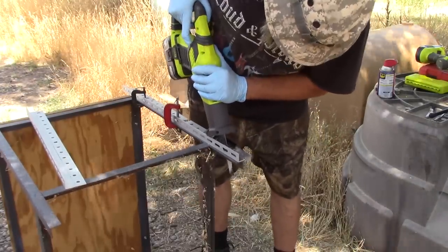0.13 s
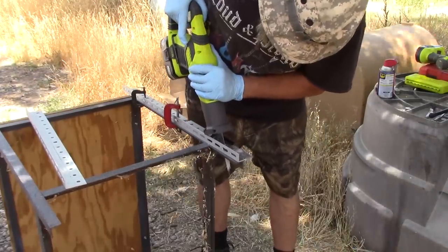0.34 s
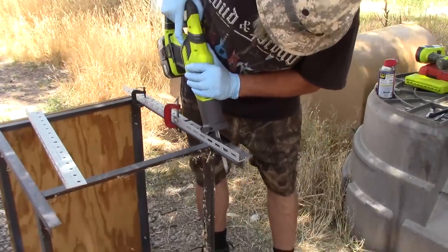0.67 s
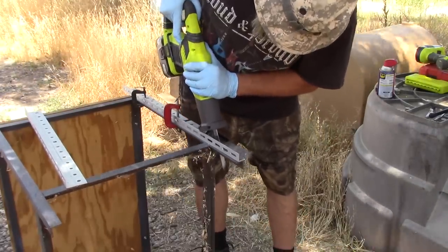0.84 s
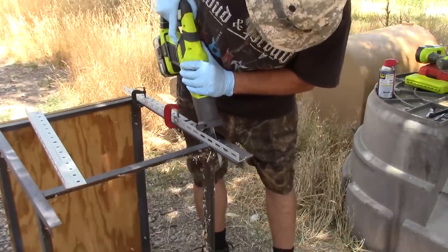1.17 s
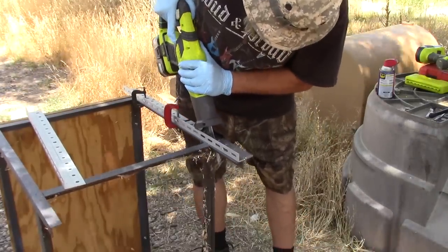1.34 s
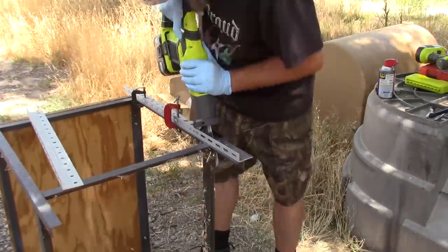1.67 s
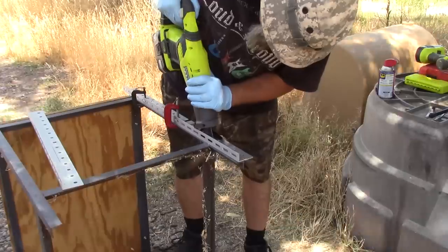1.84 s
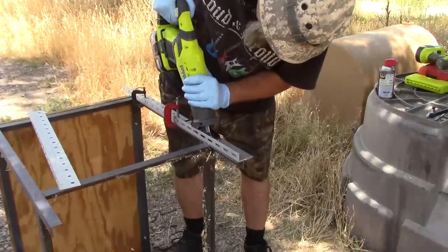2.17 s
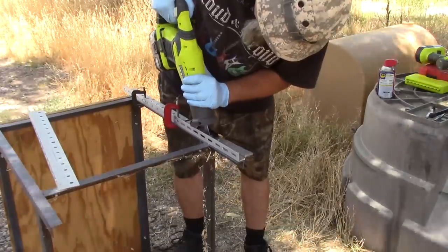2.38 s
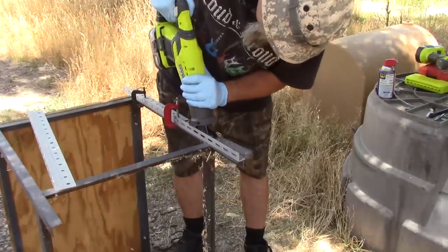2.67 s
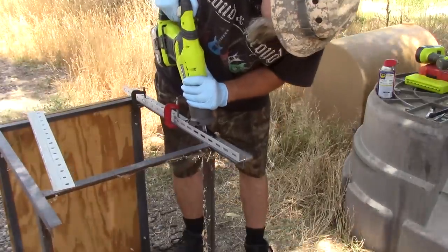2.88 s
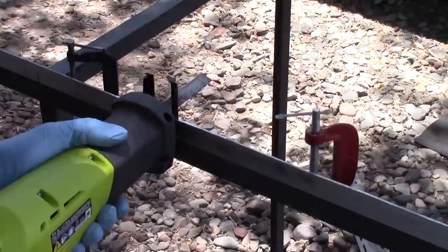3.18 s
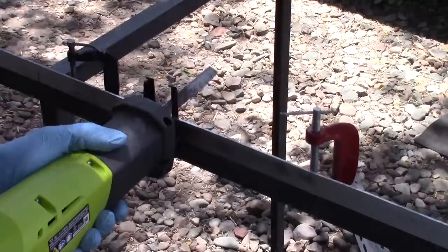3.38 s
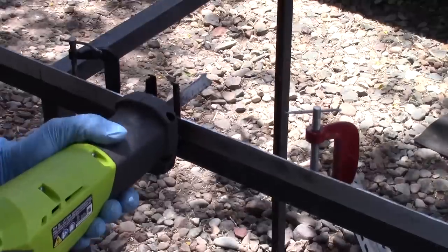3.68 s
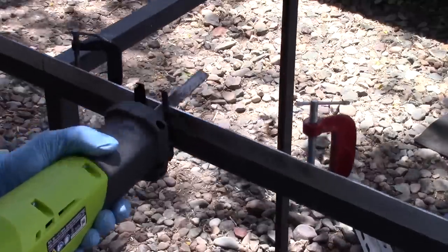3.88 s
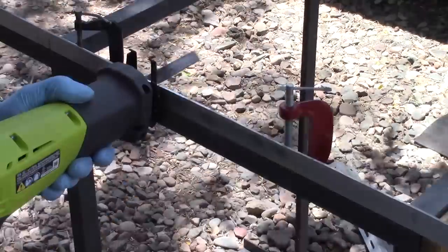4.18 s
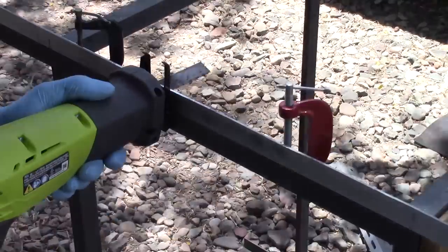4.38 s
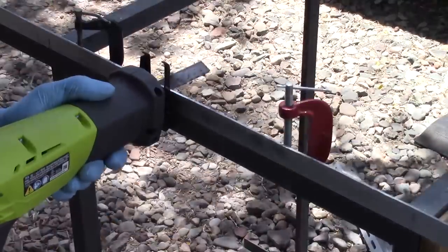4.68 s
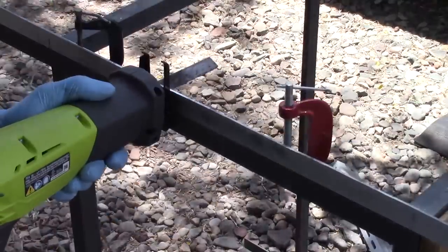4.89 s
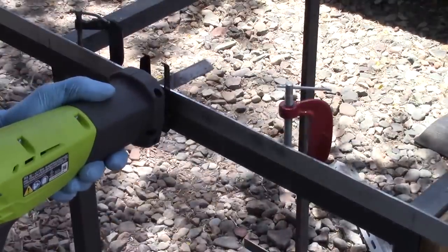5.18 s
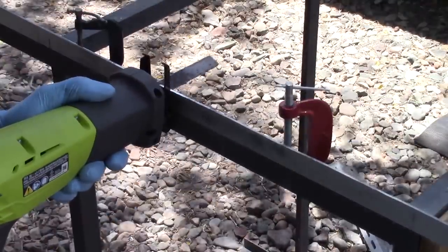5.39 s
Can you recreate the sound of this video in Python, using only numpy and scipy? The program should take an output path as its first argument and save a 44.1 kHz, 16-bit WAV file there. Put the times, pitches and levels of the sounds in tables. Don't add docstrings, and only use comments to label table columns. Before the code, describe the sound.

A power saw's teeth rasp densely on steel, with faint motor hum and wavering high squeals. It stops, rings and bites again, then the view jumps nearer: a hard knock and five or six rough, stuttering cuts, the metal vibrating louder and looser each time. Low gusty handling bumps fill the short gaps. Dry outdoor yard, small camera microphone, little low bass, compressed loud peaks, no speech.

```python
import sys
import numpy as np
from scipy import signal
from scipy.fft import rfft, irfft, next_fast_len
from scipy.io import wavfile
from scipy.ndimage import uniform_filter1d, minimum_filter1d

SR = 44100
rng = np.random.default_rng(int(sys.argv[2]) if len(sys.argv) > 2 else 0)


def amplitude_ratio(level_db):
    exponent = np.asarray(level_db, float) / 20
    return 10 ** exponent


def file_out(sig):
    cols = np.atleast_2d(sig).T
    lim = np.clip(cols, -1, 1)
    pcm = np.round(lim * 32767).astype(np.int16)
    wavfile.write(sys.argv[1], SR, pcm)


N = 243860
SIZE = next_fast_len(N + 4096)
HZ = np.maximum(np.arange(SIZE // 2 + 1) * SR / SIZE, 1)
TIME = np.arange(N) / SR
MOVE_S, TAB_LOOSE_S = 3.158, 4.4


def rms_one(x):
    return x / np.sqrt(np.mean(x ** 2) + 1e-20)


def at_hz(points, hz):
    point_hz, point_db = np.transpose(points)
    return np.interp(np.log(hz), np.log(point_hz), point_db)


def band_db(points, low_hz, high_hz):
    return 10 * np.log10(np.sum(amplitude_ratio(at_hz(points, np.arange(low_hz, high_hz))) ** 2))


def drift(rate_hz):
    r = np.exp(-80 * np.pi * rate_hz / SR)
    noise = rng.standard_normal(N // 40 + 2002)
    slow = signal.lfilter([1], [1, -2 * r, r * r], noise)[2000:]
    return np.interp(np.arange(N) / 40, np.arange(len(slow)), rms_one(slow))


# (start t/s, end t/s, level/dB)
RUMBLE_SWELLS = [(1.6, 1.768, -31), (1.8, 3.0, -46), (3.028, 3.167, -32.5), (3.516, 3.706, -36),
                 (3.928, 4.142, -40.5), (4.266, 4.374, -29), (4.604, 4.659, -27.5), (4.87, 4.926, -23),
                 (5.213, 5.236, -43.5)]
SWELL_RISE_DB_S, SWELL_FALL_DB_S = 263, 310
FLOOR_FAR_DB, FLOOR_NEAR_DB = -53.5, -76


def rumble_swells():
    levels = [np.where(TIME > MOVE_S, FLOOR_NEAR_DB, FLOOR_FAR_DB)]
    for start, end, db in RUMBLE_SWELLS:
        rise = SWELL_RISE_DB_S * np.maximum(start - TIME, 0)
        fall = SWELL_FALL_DB_S * np.maximum(TIME - end, 0)
        levels.append(db - rise - fall)
    return np.max(levels, axis=0)


# (f/Hz, level/dB per Hz)
RUMBLE_COLOUR = [(59, -36), (100, -16.5), (199, 1), (383, 0.5), (428, -5.5), (479, -12.5), (600, -12.5),
                 (780, -53), (1320, -120)]


def rumble(lumpy_db):
    steepen_db = 18 * np.maximum(np.log2(HZ / 600), 0)
    colour = amplitude_ratio(at_hz(RUMBLE_COLOUR, HZ) - steepen_db)
    noise = rms_one(irfft(rfft(rng.standard_normal(N), SIZE) * colour, SIZE)[:N])
    return noise * amplitude_ratio(rumble_swells() + lumpy_db * drift(14))


# (t/s, peak level/dB, pulse width/ms, crack level/dB rel.)
KNOCKS = [(1.755, -18, .15, 2), (3.156, -14, 1.6, -12), (3.219, -5.5, .15, -1), (3.673, -21.5, .8, -3),
          (4.0549, 1.5, 2.4, -1), (4.398, -24, .5, -4), (4.034, -24, .4, 0), (4.683, -25, .2, 3),
          (4.415, -28, .3, 2), (4.405, -32, .15, 3), (4.7, -31, .2, 3), (3.692, -33, .15, 3),
          (4.911, -5, 1.8, -34), (3.285, -17, 2.2, -30), (5.225, -18, 2.2, -30), (1.795, -13, 2.2, -30)]


def knocks():
    out, t = np.zeros(N), np.arange(1500) / SR
    for start, db, width_ms, crack_db in KNOCKS:
        rise_s = width_ms / 4000
        push = np.e * t / rise_s * np.exp(-t / rise_s)
        debris = .12 * rng.standard_normal(len(t)) * np.exp(-t / .0015)
        crack = amplitude_ratio(crack_db) * (np.exp(-t / 1e-4) + debris)
        out[round(start * SR):][:len(t)] += amplitude_ratio(db) * (push + crack)
    return out


# (f/Hz, level/dB, t60/s)
BAR_NOTCHED = [(1233, -13, .29), (775, -16, .3), (3117, 1, .27), (3704, -6, .33), (4032, -13, .3),
               (4377, -15, .18), (4764, -20, .2), (5170, -15, .1), (6444, -7, .21), (646, -14, .5)]
BAR_DEEP_CUT = [(1357, -14, .23), (2353, 0, .11), (3117, -1, 1.5), (3413, -9, .15), (3704, -2, .5),
                (4382, -6, .18), (4775, -8, .2), (5173, 1, .17), (4040, -4, .08)]
TAB_WHOLE = [(2320, -11, .23), (3763, -6, .22), (4172, 0, .14), (6412, -6, .14), (4500, 0, .07),
             (3100, -6, .08), (7600, -4, .05)]
TAB_NOTCHED = [(2600, 0, .08), (3450, 0, .13), (3850, -10, .25)]
TAB_HALF_CUT = [(3790, 0, .08), (3941, -9, .2), (6040, -3, .06), (7600, -4, .05)]
TAB_LOOSE = [(1066, -8, .5), (1976, 0, .8), (2799, -13, .3), (2480, -11, .4), (3400, -11, .3),
             (6900, -15, .3), (3080, -2, .7), (6363, -4, .3), (7187, -10, .35), (1500, -10, .3),
             (4250, -10, .2), (5250, -11, .2), (7750, -12, .25)]
# (start t/s, damped t/s, level/dB, modes)
RING_ON = [
    (1.593, 1.755, -16, BAR_NOTCHED),
    (3.042, 3.156, -16.5, BAR_DEEP_CUT),
    (3.5, 3.7, -18.5, TAB_WHOLE),
    (3.98, 4.05, -16, TAB_NOTCHED),
    (4.31, 4.39, -19.5, TAB_HALF_CUT),
    (4.57, 4.695, -23, TAB_LOOSE),
    (4.845, 4.95, -26.5, TAB_LOOSE),
]


def rings():
    out = np.zeros(N)
    for start, stop, db, modes in RING_ON:
        t = np.arange(round((stop - start) * SR)) / SR
        gate = np.clip(t / .018, 0, 1) * np.clip((t[-1] - t) / .004, 0, 1)
        for hz, mode_db, t60 in modes:
            beat = 1 + .12 * np.sin(2 * np.pi * (rng.uniform(18.8, 60) * t + rng.random()))
            tone = np.sin(2 * np.pi * (hz * t + rng.random())) * beat
            out[round(start * SR):][:len(t)] += gate * tone * amplitude_ratio(db + mode_db - 60 * t / t60)
    return out


def glides(rows):
    out = np.zeros(N)
    for start, length, from_hz, to_hz, width_hz, db in rows:
        i = round(start * SR)
        size = min(round(length * SR), N - i)
        r = np.exp(-np.pi * width_hz / SR)
        draw = rng.standard_normal((2, 2 * SR))
        wander = signal.lfilter([1], [1, -2 * r, r * r], draw[0] + 1j * draw[1])[4000:][:size]
        phase = 2 * np.pi * np.cumsum(np.linspace(from_hz, to_hz, size)) / SR
        tone = rms_one(np.real(wander * np.exp(1j * phase)))
        hump = signal.windows.tukey(round(length * SR), .6)[:size]
        out[i:i + size] += amplitude_ratio(db) * tone * hump
    return out


# (t/s, length/s, from f/Hz, to f/Hz, level/dB)
HUM = [(0, 1.6, 375, 362, -38), (2.0, 1.05, 380, 345, -38), (5.0, .53, 385, 395, -39),
       (5.0, .53, 325, 330, -40), (5.1, .43, 860, 860, -34), (4.28, .2, 130, 120, -37),
       (1.61, .16, 115, 115, -44), (4.58, .17, 125, 115, -39), (5.0, .7, 490, 490, -39),
       (5.0, .7, 680, 680, -38), (5.0, .7, 1170, 1170, -35)]


def motor():
    rows = [(s, length, from_hz, to_hz, 15, db) for s, length, from_hz, to_hz, db in HUM]
    return amplitude_ratio(-0.9) * glides(rows)


STROKES_HZ, STROKE_PEAK_S = 48.5, 4.98


def strokes():
    turn = 2 * np.pi * STROKES_HZ * (TIME - STROKE_PEAK_S)
    return (np.cos(turn) + 1.1 * np.cos(2 * turn + 4.0)) * (TIME > TAB_LOOSE_S)


# (t/s, length/s, start f/Hz, level/dB)
SQUEALS = [(.3, .6, 7920, -27), (.45, .3, 9430, -25), (.6, .6, 5190, -30), (.9, .45, 9220, -23),
           (2.05, .25, 9050, -23), (2.05, 1.1, 5300, -24), (2.3, .2, 7800, -22), (2.45, .6, 7700, -28),
           (2.62, .43, 9210, -24)]
SAG_HZ_S, SECOND_CUT_S, SECOND_SAG_HZ_S = 800, 1.7, 430
# (t/s, length/s, f/Hz, level/dB)
CATCHES = [(.2, .5, 1500, -26), (.7, .65, 4215, -27), (1.58, .035, 880, -17), (1.8, .2, 1565, -20),
           (1.8, .15, 865, -24), (1.91, .13, 675, -22), (1.8, .55, 3840, -24), (3.76, .03, 5560, -24),
           (3.825, .025, 5560, -24), (3.88, .04, 5560, -21), (3.77, .04, 3400, -22), (3.83, .05, 3377, -20),
           (3.955, .05, 2600, -18), (4.11, .06, 560, -21), (4.393, .013, 1600, -35),
           (4.426, .018, 5600, -33), (4.684, .012, 2500, -34), (4.693, .02, 5600, -31),
           (4.72, .05, 3850, -21), (4.94, .02, 5600, -33), (4.955, .03, 740, -22), (.55, .42, 1270, -25),
           (1.05, .06, 4100, -22), (1.45, .04, 4200, -22), (2.75, .3, 5680, -26), (2.75, .3, 6620, -27),
           (3.93, .03, 5560, -25), (4.22, .03, 4800, -24), (4.19, .03, 5300, -25), (4.96, .4, 1970, -25),
           (4.95, .9, 3290, -25), (4.95, .9, 2830, -28), (4.73, .11, 1976, -25), (5.0, .3, 1620, -28)]
# (t/s, length/s, f/Hz, level/dB)
ROARS = [(4.44, .13, 3150, -19), (4.712, .021, 1360, -15.5), (4.705, .165, 3250, -17.5),
         (4.92, .9, 3300, -20), (4.92, .9, 2900, -23), (2.75, .3, 6100, -26)]
CATCH_WIDTH_HZ, ROAR_WIDTH_HZ = 70, 380


def squeals():
    rows = []
    for s, length, hz, db in SQUEALS:
        sag_hz_s = SECOND_SAG_HZ_S if s > SECOND_CUT_S else SAG_HZ_S
        rows.append((s, length, hz, hz - length * sag_hz_s, .036 * hz, db))
    for table, width_hz in ((CATCHES, CATCH_WIDTH_HZ), (ROARS, ROAR_WIDTH_HZ)):
        rows += [(s, length, hz, hz, width_hz, db) for s, length, hz, db in table]
    return amplitude_ratio(2.1 * strokes()) * glides(rows)


# (f/Hz, side minus mid level/dB)
WIDTH = [(60, -10), (110, -29), (190, -6), (330, -24.5), (580, -33), (1030, -45), (1820, -11),
         (3220, -16.5), (5690, -39.5), (10000, -19)]
WIDE_START_S, WIDE_END_S = 3.1, 4.15


def reflection(x):
    delay = np.exp(-2j * np.pi * HZ * 0.005)
    late = irfft(rfft(x, SIZE) * amplitude_ratio(at_hz(WIDTH, HZ) - 8.0) * delay, SIZE)[:N]
    wide = (TIME > WIDE_START_S) & (TIME < WIDE_END_S)
    return late * np.where(wide, amplitude_ratio(-1), amplitude_ratio(-27.5))


SPREAD_S = [0, 1.7, 3.1, 3.7, 4.06, 4.4]


def spread_stage():
    return np.searchsorted(SPREAD_S, TIME, side="right") - 1


# (side level/dB rel. at 7 kHz, loss/dB per octave down)
SPREAD = [(-7, -0.5), (-8, 6), (-8, 0.5), (-3.5, 3.5), (-3.5, 2.5), (-17.5, 3.5)]


def spread_db(hz):
    levels = [db - loss * max(np.log2(7000 / hz), 0) for db, loss in SPREAD]
    return np.array(levels)[spread_stage()]


# (lowest peak f/Hz, spacing f/Hz, smooth above f/Hz)
SPREAD_COMB = [(1730, 390, 7000), (5470, 480, 11000), (1310, 340, 5000), (1300, 330, 2000),
               (2700, 400, 9000), (2600, 400, 1000)]


def spread_noise():
    white, stage, out = rfft(rng.standard_normal(N), SIZE), spread_stage(), 0
    for k, (lowest, spacing, smooth) in enumerate(SPREAD_COMB):
        offset = np.pi * (HZ - lowest) / spacing
        comb = np.cos(2 * offset) + .5 * np.cos(.77 * offset) - .6
        comb = np.clip(comb + 1.6 * (HZ / smooth) ** 2, 0, 1) * (HZ > lowest - spacing / 2)
        out = out + irfft(white * comb, SIZE)[:N] * (stage == k)
    return out


YARD_DB, YARD_RATTLE_DB, YARD_HISS_DB = -48.5, 10.5, -6


def yard():
    return np.ones((3, N)) * [[YARD_DB], [YARD_RATTLE_DB], [YARD_HISS_DB]]


# (start t/s, lifted t/s)
COASTS = [(1.6, 1.755), (3.06, 3.158), (3.5, 3.668), (3.6, 3.618), (3.668, 3.705), (3.99, 4.052),
          (4.3, 4.345), (4.39, 4.425), (4.437, 4.46), (4.55, 4.71), (4.84, 4.96)]
# (rasp level/dB, fade/dB per s)
COAST_TONE = [(-36, 12), (-32, 88), (-40, 108), (-42.5, 50), (-39, 40), (-33, 70), (-20.5, 205),
              (-37.5, 30), (-29, -100), (-18.5, 148), (-21.5, 89)]
COAST_FAINT_DB, COAST_RATTLE_DB, COAST_HISS_DB = -38, 10.5, -15
COAST_LOUD_DB, LOUD_RATTLE_DB, LOUD_HISS_DB = -29, -18, -12


def coasts():
    layers = []
    for (start, lifted), (db, fade) in zip(COASTS, COAST_TONE):
        level = db - fade * (TIME - start)
        loudness = [COAST_FAINT_DB, COAST_LOUD_DB]
        rattle = np.interp(level, loudness, [COAST_RATTLE_DB, LOUD_RATTLE_DB])
        hiss = np.interp(level, loudness, [COAST_HISS_DB, LOUD_HISS_DB])
        outside_s = np.maximum(np.maximum(start - TIME, TIME - lifted), 0)
        layers.append([level - 3000 * outside_s, rattle, hiss])
    return layers


# (start t/s, bite/s, stop t/s, let-go/s)
BURSTS = [(-.1, .02, 1.601, .016), (1.774, .014, 2.06, .02), (2.04, .02, 3.052, .024),
          (3.208, .026, 3.505, .034), (3.714, .011, 3.99, .035), (4.096, .014, 4.305, .03),
          (4.432, .026, 4.55, .035), (4.706, .01, 4.845, .02), (4.95, .02, 5.7, .02)]
# (rasp level/dB, sag/dB per s, rattle level/dB rel., hiss level/dB rel.)
BURST_TONE = [(-15, 0, -10.5, 0.5), (-11.5, 13.5, -6, -8.5), (-13.5, 1.5, -6.5, 0), (-12, 11, -5.5, -5),
              (-12, 18, -8, -5), (-11, 27, -5, -4.5), (-13.5, 38, -11, -4), (-17.5, -5, -10.5, -3),
              (-15, 4, -9.5, -5.5)]
BITE_DULL_S, BITE_RATTLE_DB, BITE_HISS_DB = 0.036, 10.5, -15


def cuts():
    layers, stopped = [], -1
    for (start, bite, stop, let_go), (db, sag, rattle_db, hiss_db) in zip(BURSTS, BURST_TONE):
        fresh = np.exp(-np.maximum(TIME - start, 0) / BITE_DULL_S) * (start > stopped)
        edge = np.minimum(np.minimum((TIME - start) / bite - 1, (stop - TIME) / let_go), 0)
        level = db - sag * np.clip(TIME - start, 0, stop - start) + 30 * edge
        layers.append([level, rattle_db + BITE_RATTLE_DB * fresh, hiss_db + BITE_HISS_DB * fresh])
        stopped = stop
    return layers


# (t/s, level/dB)
SNAGS = [(.212, -0.5), (.288, -2), (.43, -4), (.774, 7), (.929, 4.5), (1.415, -3), (1.801, -2.5),
         (1.851, -3), (1.948, -2), (2.142, -2.5), (2.209, -4), (2.35, -6), (2.451, -4.5), (2.66, -2.5),
         (2.802, -4.5), (2.819, 10), (3.366, -1.5), (3.742, -12), (3.762, 1.5), (3.786, -4), (3.918, -3.5),
         (3.951, -1), (3.967, 3.5), (4.127, -3), (4.184, -4), (4.228, 0), (4.255, -2), (4.477, 4),
         (4.543, 1.5), (4.753, 6.5), (4.777, 2.5), (4.807, 2.5), (4.94, -1), (5.022, 2.5), (5.114, -4.5),
         (5.165, 2.5), (5.196, -4), (5.235, -3), (5.254, -1), (5.27, -0.5), (5.307, 0), (5.468, -3.5)]
SNAG_WIDTH_S = .006
LABOUR_START_S, LABOUR_END_S, LABOUR_TURN_S, LABOUR_HZ = 3.72, 3.995, 3.792, 15.6
LABOUR_RATTLE_DB, LABOUR_DIP_DB = 5, -5


def contact():
    rasp, rattle, hiss = np.transpose([yard(), *cuts(), *coasts()], (1, 0, 2))
    middle, low, high = [10 * np.log10(np.sum(amplitude_ratio(2 * np.maximum(db, -150)), axis=0))
                         for db in (rasp, rasp + rattle, rasp + hiss)]
    snags = sum(db * np.exp(-((TIME - s) / SNAG_WIDTH_S) ** 2) for s, db in SNAGS)
    turn = 2 * np.pi * LABOUR_HZ * (TIME - LABOUR_TURN_S)
    bound = (TIME > LABOUR_START_S) & (TIME < LABOUR_END_S)
    push = LABOUR_RATTLE_DB * bound * np.tanh(4.2 * np.sin(turn))
    dip = LABOUR_DIP_DB * bound * np.maximum(np.cos(turn), 0) ** 2
    return middle + snags, low - middle + push, high - middle + dip


def teeth(per_s, spread_db):
    sizes = amplitude_ratio(spread_db * np.minimum(rng.exponential(1, N), 4)) * rng.choice([-1, 1], N)
    return rms_one(sizes * (rng.random(N) < per_s / SR))


# (f/Hz, width/Hz, level/dB rel. rasp)
FAR_MODES = [(913, 43, -21), (1275, 110, -20), (1510, 41, -26), (1910, 540, -18), (2460, 50, -33),
             (3045, 23, -17.5), (3770, 70, -17.5), (4080, 62, -16), (5310, 220, -16), (5540, 41, -26),
             (6850, 75, -19), (7620, 75, -22), (8570, 270, -20.5)]
NEAR_MODES = [(638, 58, -20.5), (1170, 43, -20), (1600, 87, -16.5), (1960, 23, -17.5), (2365, 38, -25),
              (2796, 65, -7.5), (3130, 90, -14), (3430, 120, -32), (3810, 140, -10.5), (4400, 32, -25),
              (4760, 39, -31), (5360, 55, -24.5), (5610, 71, -20.5), (6340, 110, -17), (7350, 80, -28),
              (8300, 250, -22)]
STEEL_WAKES_DB, TAB_TIGHT_DB = -26, -4
CROWD, CROWD_WIDTH_HZ, CROWD_DB, CROWD_FLARE_DB, CROWD_FLARES_PER_S = 26, 90, -24, 5, 16


def steel(level_db, near, swell_db):
    out = 0
    tight_db = TAB_TIGHT_DB * (near & (TIME < TAB_LOOSE_S))
    drive_db = level_db + np.minimum(level_db - STEEL_WAKES_DB, 0) + tight_db
    for modes, on in ((FAR_MODES, ~near), (NEAR_MODES, near)):
        drive = teeth(9000, spread_db=2.5) * amplitude_ratio(drive_db) * on
        crowd = np.geomspace(700, 9300, CROWD) * rng.uniform(.96, 1.04, CROWD)
        minor = [(hz, CROWD_WIDTH_HZ, CROWD_DB) for hz in crowd]
        for k, (hz, width_hz, db) in enumerate(list(modes) + minor):
            r = np.exp(-np.pi * max(width_hz, 45) / SR)
            main = k < len(modes)
            flares = swell_db * drift(9.2) if main else CROWD_FLARE_DB * drift(CROWD_FLARES_PER_S)
            gain = amplitude_ratio(db + np.clip(flares, -12, 9)) * np.sqrt((1 - r * r) / 2)
            poles = [1, -2 * r * np.cos(2 * np.pi * hz / SR), r * r]
            out = out + signal.lfilter([1, 0, -1], poles, drive * gain + 1e-18)
    return out


# (f/Hz, level/dB per Hz)
FAR_STEEL = [(180, -45.5), (300, -7.5), (363, -2.5), (426, -6), (886, -5.5), (1060, -7), (1300, -3),
             (3260, -5.5), (5050, -3.5), (9300, -1.5), (9950, -25.5), (12900, -33), (21800, -120)]
NEAR_STEEL = [(180, -16), (300, -21.5), (597, -2.5), (912, -5), (1170, -2), (1350, -2.5), (1590, 1),
              (2580, -0.5), (2810, -3), (3260, 1.5), (4830, -3), (8430, -5.5), (9900, -28), (12900, -39),
              (21800, -120)]


def rasp_colour_db(colour, hz, low, high):
    bass_db = band_db(colour, 430, 1510) - band_db(colour, 1400, 3520)
    treble_db = band_db(colour, 4500, 10000) - band_db(colour, 1300, 4500)
    return at_hz(colour, hz) - band_db(colour, 670, 6150) - low * bass_db - high * treble_db


def blade(patchy_db, chatter_db, grit_db, stroke_db):
    rasp, rattle, hiss = contact()
    near = TIME > MOVE_S
    rasp = rasp + chatter_db * drift(60) + grit_db * drift(200) + stroke_db * strokes()
    clicks = rfft([teeth(16000, spread_db=-0.5), spread_noise()], SIZE)
    centres_hz = 500 * 2 ** (np.arange(-3, 18) / 4)
    capped_hz = np.minimum(HZ, 500 * 2 ** (17 / 4))
    out = 0
    for hz in centres_hz:
        window = np.maximum(1 - np.abs(4 * np.log2(capped_hz / hz)), 0)
        part = irfft(clicks * window, SIZE)[:, :N]
        low, high = np.clip([np.log2(1500 / hz), np.log2(hz / 3800) * 0.88], 0, 1)
        far_db, near_db = [rasp_colour_db(s, hz, low, high) for s in (FAR_STEEL, NEAR_STEEL)]
        colour_db = np.where(near, near_db, far_db)
        db = rasp + low * rattle + high * hiss + colour_db + patchy_db * drift(20.0)
        out = out + part * amplitude_ratio([db, db + spread_db(hz)])
    return out * np.sqrt(SR / 2) + steel(rasp, near, swell_db=2.2) * [[1], [0]]


def scene():
    rest = rumble(lumpy_db=-2.0) + knocks() + rings() + motor() + squeals()
    mid, side = blade(patchy_db=1.0, chatter_db=1.2, grit_db=0.5, stroke_db=0.1)
    mid, side = mid + rest, side + reflection(rest)
    return np.array([mid + side, mid - side])


def band_limit(x):
    return signal.sosfilt(signal.butter(12, 10650, fs=SR, output="sos"), x)


def record(dry):
    x = signal.sosfilt(signal.cheby1(10, .5, 118, "high", fs=SR, output="sos"), dry)
    over = np.maximum(np.abs(x).max(axis=0) / .68, 1)
    x = x * uniform_filter1d(minimum_filter1d(1 / over, size=31), size=31)
    x = signal.sosfilt(signal.butter(2, 110, "high", fs=SR, output="sos"), x)
    cliff_db = np.interp(HZ, [10030, 10190, 10300], [0, -24, -80])
    x = irfft(rfft(x, SIZE) * amplitude_ratio(cliff_db), SIZE)[:, :N]
    return band_limit(x)


dry = scene()
out = record(dry)
file_out(out)
```